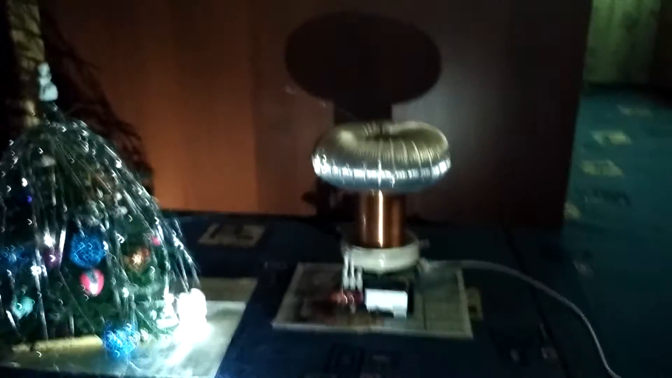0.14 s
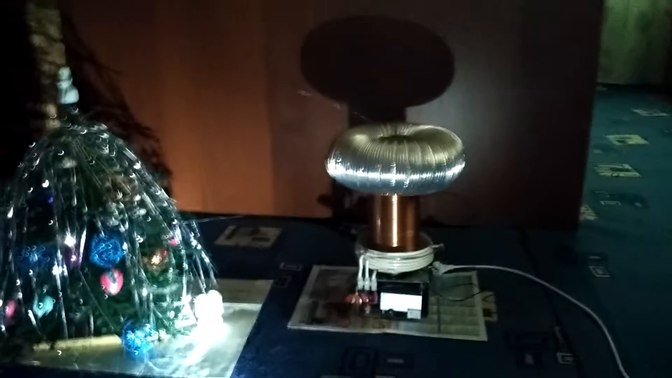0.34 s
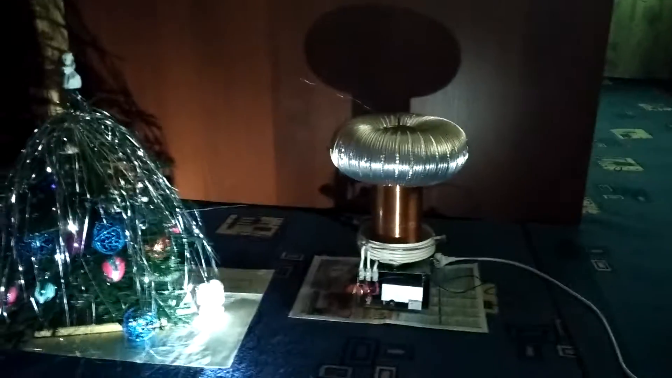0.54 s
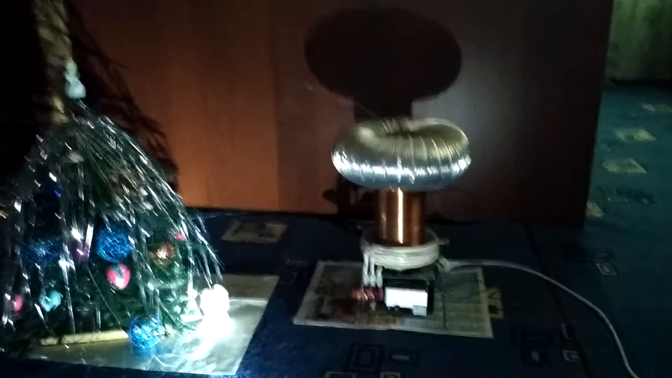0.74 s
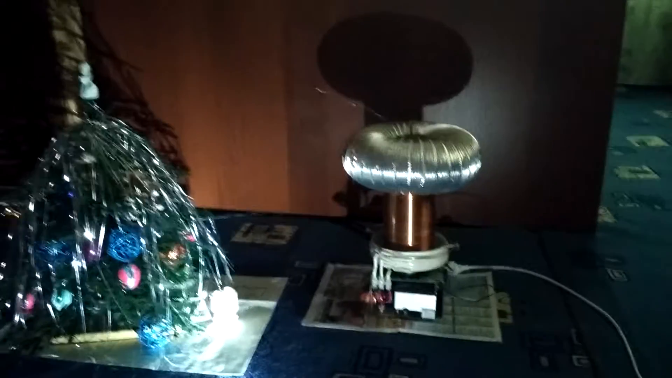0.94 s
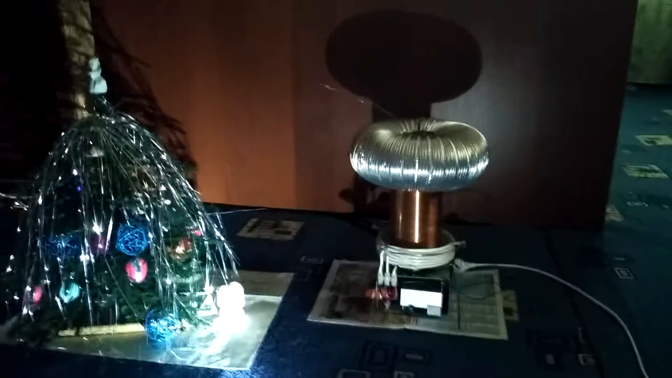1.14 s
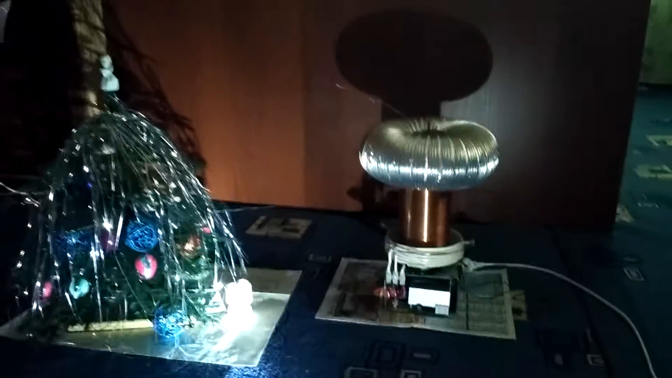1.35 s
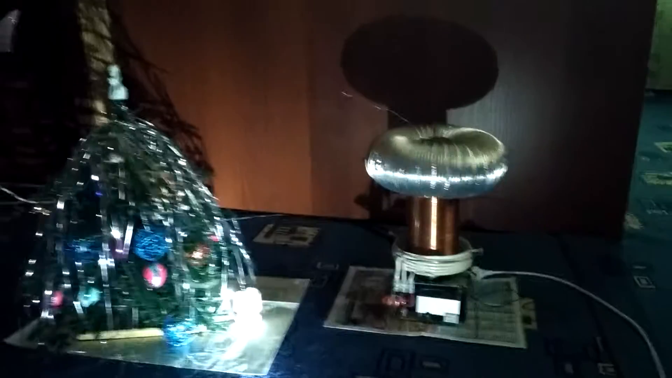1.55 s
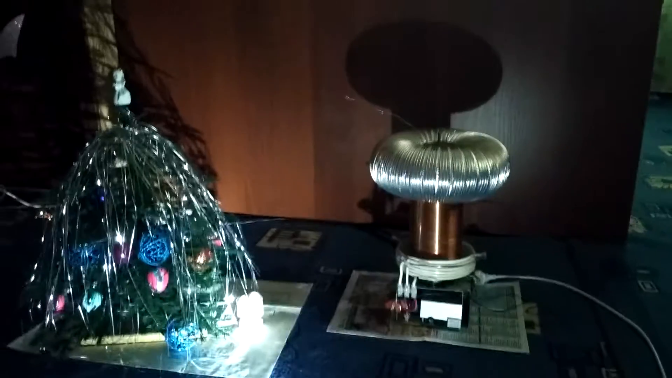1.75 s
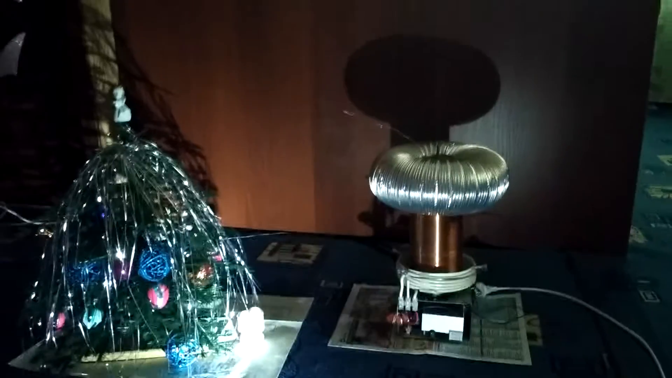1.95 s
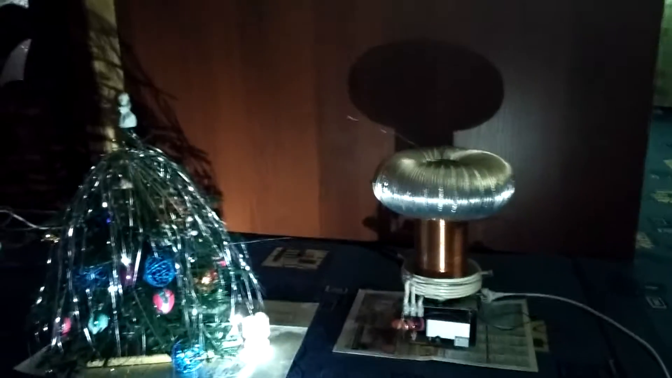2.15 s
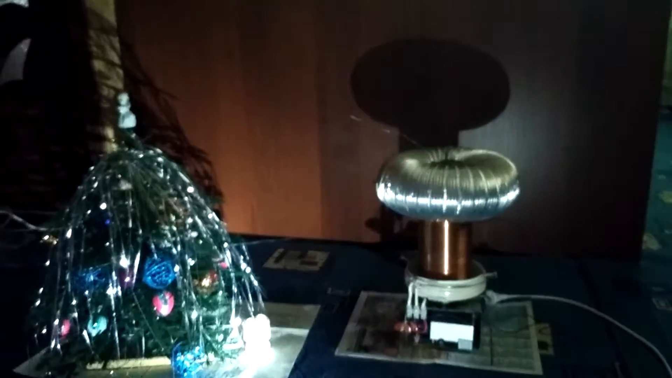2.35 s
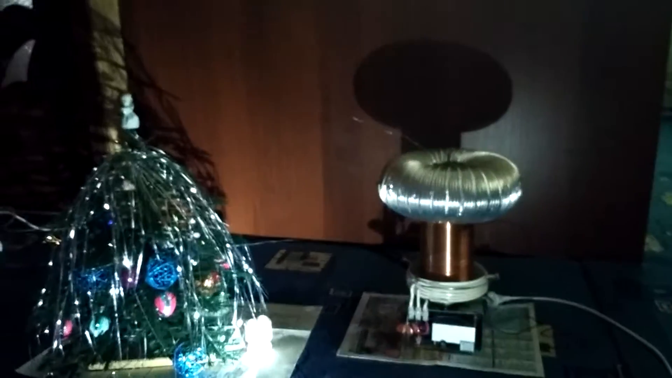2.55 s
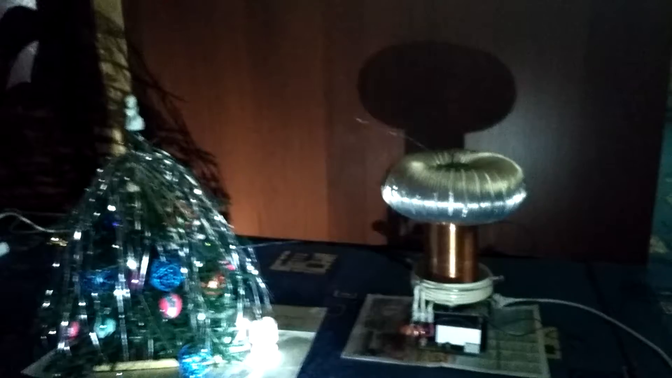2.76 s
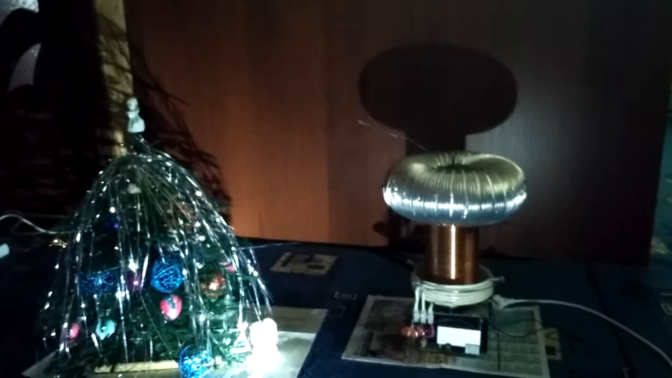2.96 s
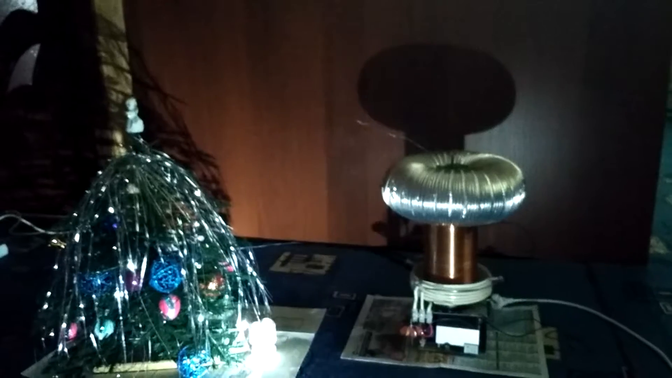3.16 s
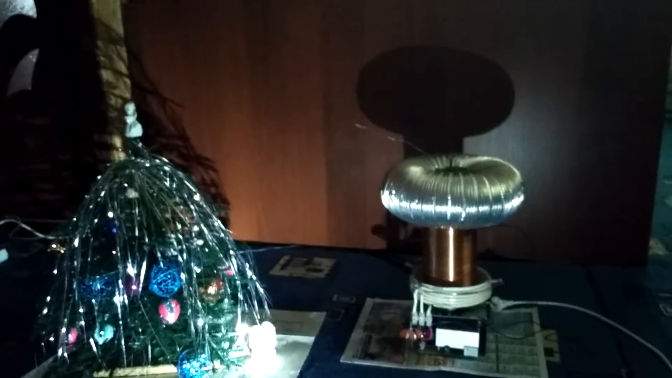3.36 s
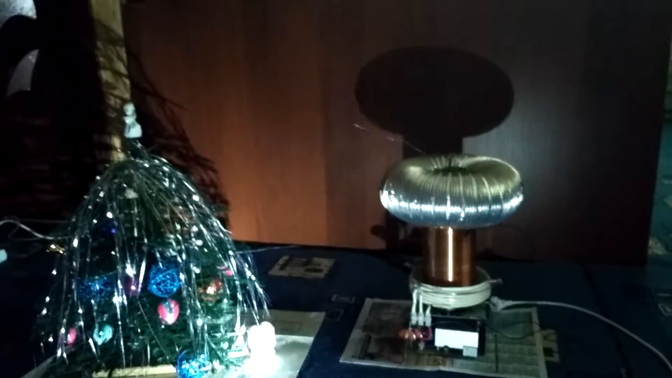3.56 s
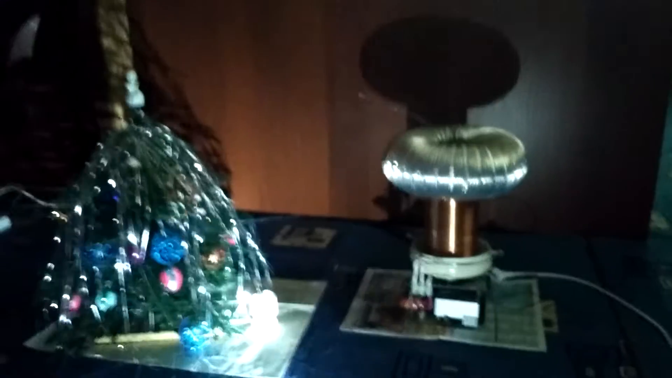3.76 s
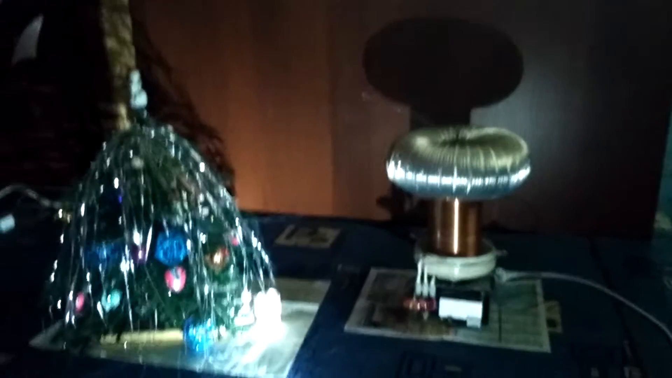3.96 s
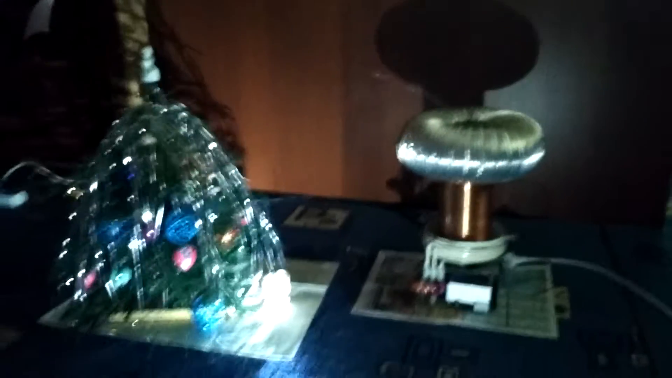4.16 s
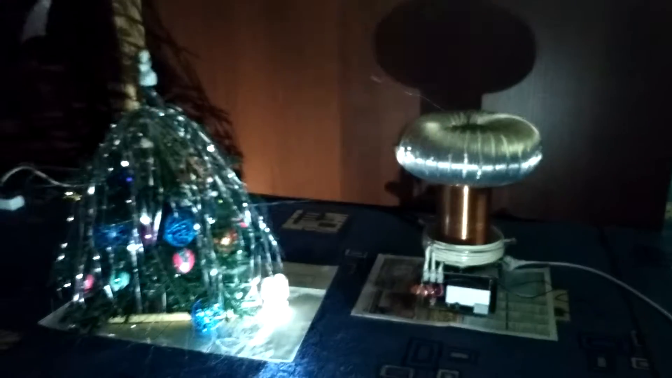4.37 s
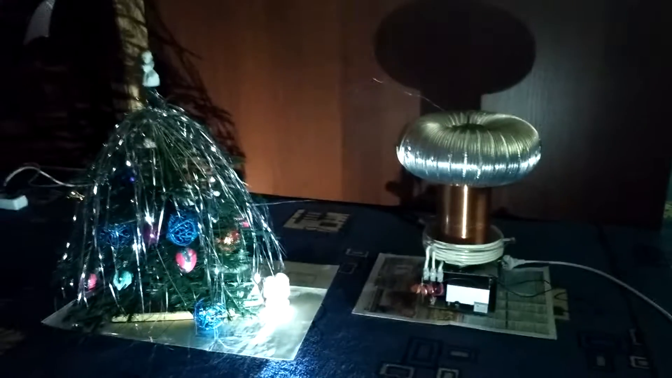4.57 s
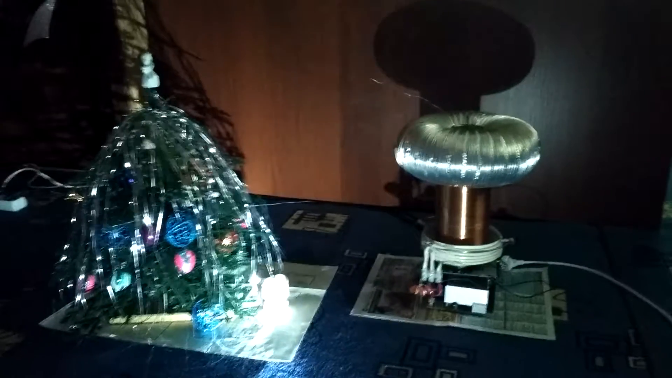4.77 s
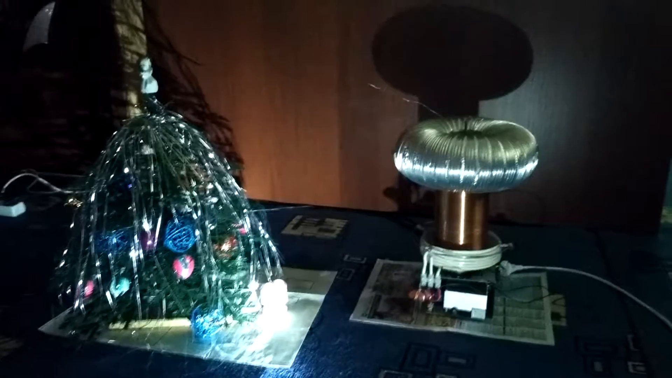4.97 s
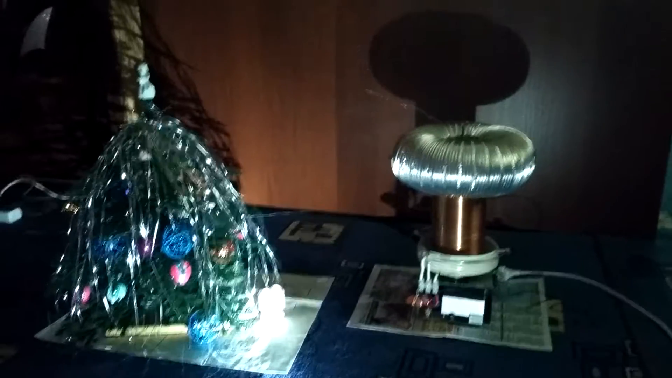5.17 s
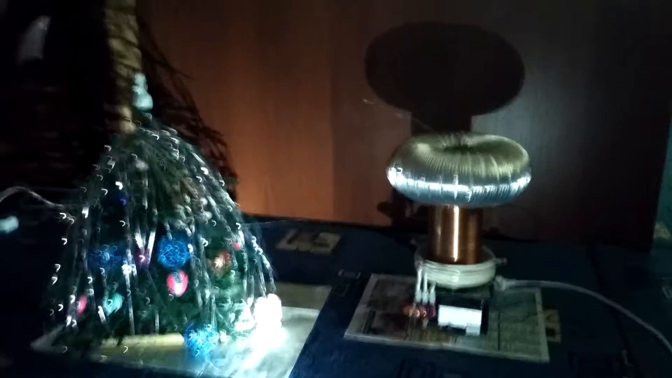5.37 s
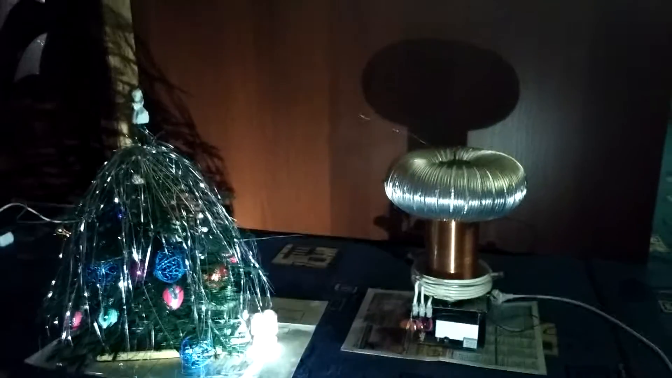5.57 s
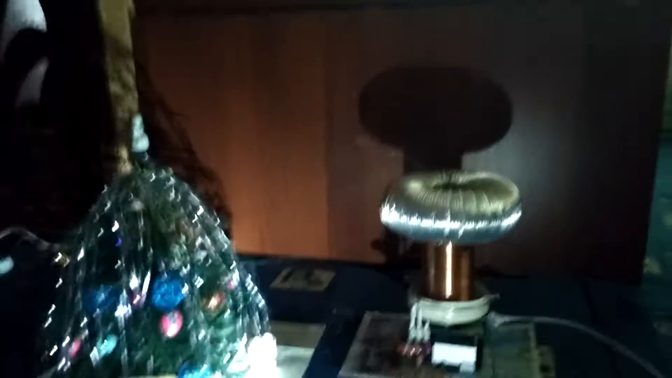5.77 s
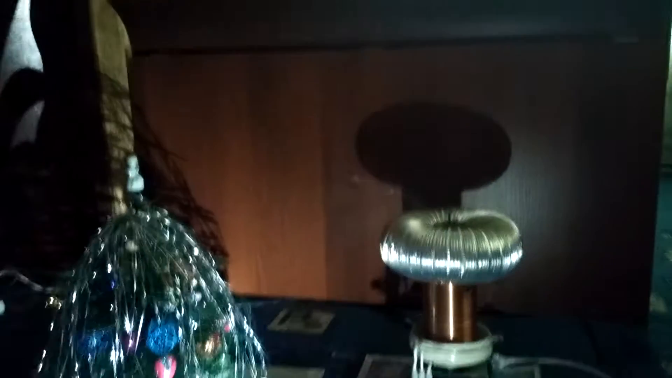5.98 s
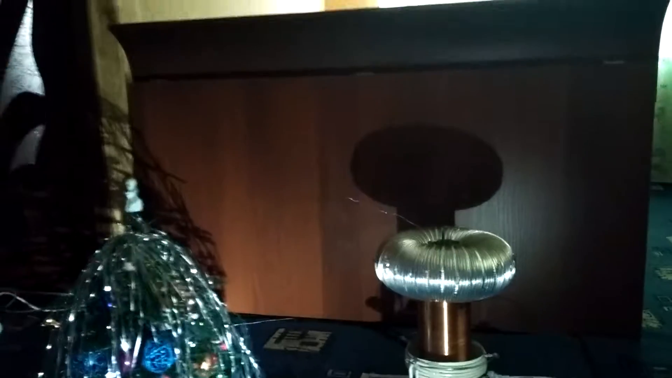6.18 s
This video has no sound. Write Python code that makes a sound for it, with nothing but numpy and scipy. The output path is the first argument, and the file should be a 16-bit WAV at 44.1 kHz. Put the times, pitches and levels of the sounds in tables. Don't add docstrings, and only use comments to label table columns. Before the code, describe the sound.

A furnished indoor room with faint low hum. A hand knocks the camera body with one dull thump, fingers rustle lightly, and a switch ticks. Then a small high-voltage coil fires hard, very loud spark cracks at an even five per second until the end. Each overloads the close handheld microphone and leaves a brief, boxy room tail that is quickly choked off.

```python
import sys
import numpy as np
from scipy import signal
from scipy.fft import rfft, irfft
from scipy.io import wavfile
from scipy.ndimage import uniform_filter1d

SR = 44100
rng = np.random.default_rng(int(sys.argv[2]) if len(sys.argv) > 2 else 0)


def wav_out(sig):
    wavfile.write(sys.argv[1], SR, np.round(np.clip(np.atleast_2d(sig).T, -1, 1) * 32767).astype(np.int16))


def attenuation_scalar(level_db):
    decades = np.asarray(level_db, float) / 20
    return 10 ** decades


N = 274302

# frequency [Hz], starting level [dB per Hz], t60 [s],
# share that is the same for every spark [0-1].
ROOM_TAIL = [(40, -13, 1, 1), (123, -10, 1, 0.5), (403, 0.5, 0.34, 1), (990, 4.5, 0.27, 0.4),
             (1450, 7, 0.21, 0.97), (2790, -1.5, 0.26, 0), (5030, 0.5, 0.19, 0.06), (9700, -4, 0.17, 0.5),
             (13200, -5, 0.15, 0), (16500, -4.5, .16, 1)]


def evened(x):
    return x / np.sqrt(np.mean(x ** 2) + 1e-20)


def read(points, hz, axis=1):
    table = np.array(points)
    return np.interp(np.log(hz + 1), np.log(table[:, 0] + 1), table[:, axis])


def add(mix, s, sound):
    part = mix[round(s * SR):][:len(sound)]
    part += sound[:len(part)]


def filtered(x, hz, kind, order=2):
    return signal.sosfilt(signal.butter(order, hz, kind, fs=SR, output="sos"), x)


def air_noise():
    # frequency [Hz], level [dB per Hz].
    spectrum = [(20, -25.5), (45, -6), (80, -6), (120, -14), (220, -13.5), (400, -15), (600, -19.5),
                (730, -26.5), (950, -17), (1400, -24), (2500, -30), (5000, -39), (9000, -51), (16000, -51)]
    level_db, rise_db_per_s = -57, 1.5
    frames, hz = N // 512 + 5, np.fft.rfftfreq(2048, 1 / SR)
    real, imag, patches = rng.standard_normal((frames, 1025, 3)).T
    patches = evened(uniform_filter1d(uniform_filter1d(patches, 3, 0), 10, 1))
    swell = uniform_filter1d(rng.standard_normal(real.shape), size=90, axis=0)
    swell = evened(uniform_filter1d(swell, size=9, axis=1))
    level = attenuation_scalar(read(spectrum, hz)[:, None] + 2.9 * patches + 0.5 * swell)
    air = signal.istft((real + 1j * imag) * level, nperseg=2048, noverlap=1536)[1][:N]
    rise_db = rise_db_per_s * np.minimum(np.arange(N) / SR - 1, .5)
    return attenuation_scalar(level_db + rise_db) * evened(air)


def drone():
    drone_hz, width_hz, level_db = 78, 4.7, -64
    wobble = filtered(rng.standard_normal((2, N)), width_hz, "low", order=1)
    envelope = 1.6 + evened(wobble[0]) + 1j * evened(wobble[1])
    tone = (envelope * np.exp(2j * np.pi * drone_hz * np.arange(N) / SR)).real
    return attenuation_scalar(level_db) * evened(tone)


def rustle():
    # start [s], level [dB].
    crackles = [
        (.028, -60),
        (.38, -66),
        (.58, -65),
        (.64, -63),
        (.70, -59),
        (.985, -61),
        (1.15, -67),
    ]
    t, out = np.arange(600) / SR, np.zeros(N)
    puffs = rng.standard_normal((len(crackles), len(t)))
    for (s, db), puff in zip(crackles, puffs):
        add(out, s, attenuation_scalar(db - 60 * t / .025) * puff)
    return filtered(out, [1500, 6000], "band", order=1)


def bumps():
    # start [s], level [dB], starting pitch [Hz], length [s].
    knock = [
        (.125, -40, 73, .02),
        (.1445, -22.5, 118, .021),
        (.148, -39, 275, 0.018),
        (.1645, -17, 78, 0.063),
        (.166, -36, 169, 0.041),
        (.17, -38, 250, 0.025),
        (.205, -44, 182, 0.02),
        (.262, -47, 62, .035),
    ]
    # start [s], level [dB], starting pitch [Hz], length [s].
    shifts = [
        (.019, -36, 76, 0.048),
        (.224, -38, 74, 0.035),
        (.328, -48, 68, 0.04),
        (.564, -46, 70, 0.044),
        (5.40, -28, 54, .08),
    ]
    out = np.zeros(N)
    for table, sag_octaves_per_s in ((knock, 18), (shifts, 0.7)):
        for s, db, hz, length_s in table:
            u = np.arange(0, 1, 1 / (length_s * SR))
            turns = np.cumsum(hz * 2 ** (-sag_octaves_per_s * length_s * u)) / SR
            push = np.sin(2 * np.pi * turns) * np.sin(np.pi * u ** 0.66) ** 1.6
            add(out, s, -attenuation_scalar(db) * push)
    return out


def ticks():
    # start [s], click level [dB], hiss level [dB], hiss t60 [s].
    contacts = [
        (.78, -56, -60, .15),
        (.806, -46, -50, 0.037),
        (.8122, -43, -66, .05),
        (0.8159, -18.5, -49.5, 0.35),
        (.837, -35, -68, .1),
        (1.2122, -48, -42, .03),
        (1.2135, -49, -50, 0.23),
    ]
    t, out = np.arange(12000) / SR, np.zeros(N)
    hisses = filtered(rng.standard_normal((len(contacts), len(t))), 4900, "high", order=10)
    hisses = filtered(hisses, 9000, "low", order=1)
    click = filtered(1. * (t == 0), 3600, "high")
    for (s, click_db, hiss_db, t60_s), hiss in zip(contacts, hisses):
        add(out, s, attenuation_scalar(click_db) * click + attenuation_scalar(hiss_db - 60 * t / t60_s) * hiss)
    return out


def early_echoes(t):
    # delay [s], level [dB].
    arrivals = [
        (0, 4),
        (.0013, 13.5),
        (.0029, 5.5),
        (.0057, 2),
        (.0084, 3.5),
        (0.0122, 13.5),
        (0.0128, 24.5),
        (.0362, 7.5),
    ]
    crack_s, level_db = 0.00033, -9
    u = t[:200] / crack_s
    crack, out = (1 - u / 2) * np.exp(-u / 2), np.zeros(len(t))
    for s, db in arrivals:
        add(out, s, attenuation_scalar(db + level_db) * crack)
    return filtered(out, 1300, "high")


def room_modes(t):
    # frequency [Hz], level [dB], t60 [s],
    # side [+1 if coil and microphone lie on like sides of the nodes, else -1].
    modes = [(76.6, -20.7, 0.17, 1), (98.7, -28.4, 0.3, -1), (126.9, -18.4, 0.18, -1),
             (155.3, -20.8, 0.18, -1), (188.7, -16.0, 0.07, 1), (235.8, -13.2, 0.12, -1),
             (287.0, -17.3, 0.21, 1), (306.0, -14.5, 0.07, -1), (360.2, -12.1, 0.15, 1),
             (376.5, -18.0, 0.13, -1), (416.5, -24.8, 0.35, 1), (429.7, -20.8, 0.14, -1),
             (460.3, -29.1, 0.28, -1), (495.9, -26.1, 0.35, 1), (552.8, -25.8, 0.3, 1),
             (588.4, -19.2, 0.15, -1), (616.6, -26.2, 0.19, 1), (657.7, -23.1, 0.23, -1),
             (738.8, -14.6, 0.13, 1), (753.8, -31.1, 0.35, 1), (783.9, -19.9, 0.15, -1),
             (830.6, -11.4, 0.07, 1), (943.8, -27.4, 0.23, 1), (1013.9, -2.0, 0.09, -1),
             (1015.7, -2.5, 0.11, 1), (1032.7, -30.0, 0.29, 1), (1086.7, -11.9, 0.08, 1),
             (1118.0, -21.6, 0.18, -1)]
    # frequency [Hz], level [dB], t60 [s].
    lingering = [(137, -31, .3), (422, -29, .38), (1110, -24, .2), (528, -29, .38), (1238, -31, .25),
                 (1378, -32, .25)]
    level_db, t60_scale, longest_s = 4, 0.81, 0.23
    ring = np.zeros(len(t))
    for hz, db, t60_s, side in modes:
        decay_db = 60 * t / min(t60_s * t60_scale, longest_s)
        ring += side * attenuation_scalar(db - decay_db) * np.sin(2 * np.pi * hz * t)
    for k, (hz, db, t60_s) in enumerate(lingering):
        ring += (-1) ** k * attenuation_scalar(db - 60 * t / t60_s) * np.sin(2 * np.pi * hz * t)
    return attenuation_scalar(level_db) * ring


def diffuse(noise):
    fresh_db, fresh_s = 2, 0.051
    hz, t, z = signal.stft(noise, SR, nperseg=256)
    first_db = fresh_db * np.outer(hz / 12000, np.exp(-t / fresh_s))
    z = z * attenuation_scalar(first_db - 60 * t / read(ROOM_TAIL, hz, axis=2)[:, None])
    return signal.istft(z, SR, nperseg=256)[1][..., :noise.shape[-1]]


def spark_tails(treble_db, size):
    grain_db, level_db = 1, -5
    t, hz = np.arange(size) / SR, np.fft.rfftfreq(size, 1 / SR)
    same = np.clip(read(ROOM_TAIL, hz, axis=3), 0, 1)
    rays, weights = rng.standard_normal((2, len(treble_db) + 1, size))
    grain = evened(uniform_filter1d(weights, size=12, axis=1))
    rays = evened(rays * attenuation_scalar(grain_db * grain))
    fixed, fresh = rfft(rays[0]), rfft(rays[1:])
    lobes = evened(uniform_filter1d(rng.standard_normal(fresh.shape), size=400, axis=1))
    tilt_db = (np.array(treble_db)[:, None] + 2) * np.clip(hz / 7000, 0, 1)
    colour = attenuation_scalar(read(ROOM_TAIL, hz) + tilt_db + 1.28 * lobes)
    tails = diffuse(irfft((same * fixed + np.sqrt(1 - same ** 2) * fresh) * colour))
    thicken = 1 - 0.48 * np.exp(-t / 0.0035)
    return tails * attenuation_scalar(level_db) * thicken


def sparks():
    treble_db = [-3.5, -2.5, -1.1, 0, -1.5, -1.5, -1.5, -0.5, 0, 2.5, 0.5, 4, 0, 4, 2.5, 2.5, 1.5, 4.5, 1.5,
                 0, 2.5, 0.5, 3, 1.5, 2.5]
    first_s, period_s, jitter_s = 1.37745, 0.19991, 0.0001
    strength_db, uneven_db, fork_spread_s = -0.16, -1.6, 0.0001
    size, out = 16384, np.zeros(N)
    t = np.arange(size) / SR
    early = early_echoes(t) + room_modes(t)
    tails = spark_tails(treble_db, size)
    draws = rng.uniform(0, 1, (len(treble_db), 6))
    for k, (tail, (late, big, *forks)) in enumerate(zip(tails, draws)):
        fork_delays = (np.square(forks) * fork_spread_s * SR).astype(int)
        smear = np.bincount(fork_delays) / len(forks)
        s = first_s + k * period_s - 2 * jitter_s * late
        db = strength_db + 2 * uneven_db * (big - .5)
        add(out, s, attenuation_scalar(db) * (np.convolve(early, smear)[:size] + tail))
    return out


def scene():
    return (sparks() + bumps() + ticks() + air_noise() + drone() + rustle())[None]


def overload(x):
    ceiling_db, drive_db, bass_hz = -1.8, 2, 43.5
    bent = np.tanh((attenuation_scalar(drive_db) * abs(x)) ** 1.587) ** (1 / 1.601)
    return filtered(attenuation_scalar(ceiling_db) * bent * np.sign(x), bass_hz, "high", order=2)


def suppress(x):
    # frequency [Hz], part of running average counted as noise [dB], deepest cut [dB].
    bands = [(60, -15.5, -4.5), (300, -18.5, -12), (1000, -19, -4.5), (2500, -16, -8), (4870, -14, -10),
             (5070, -23.5, -7), (9000, -22, -12.5), (16000, -25.5, -7.5)]
    # tail level under the running average [dB], cut [dB].
    drops = [(-10, -9), (-19, -7)]
    split_hz, memory_s, soft_db, split_ring = 5050, 0.31, 0.5, .0006
    hz, t, z = signal.stft(x, SR, nperseg=441, noverlap=294)
    low = hz < split_hz
    power = (abs(z[:, (hz > 500) & low]) ** 2).mean(1, keepdims=True)
    decisions = np.minimum(np.arange(len(t)) // 3 * 3 + 1, len(t) - 1)
    power = uniform_filter1d(power, size=3, axis=2)[..., decisions] + 1e-20
    r = np.exp(-.01 / 3 / memory_s)
    usual = signal.lfilter([1 - r], [1, -r], power)
    under_db = 10 * np.log10(power / usual)
    step_db = sum(db * (.5 + .5 * np.tanh((at_db - under_db) / soft_db)) for at_db, db in drops)
    noise = usual * attenuation_scalar(2 * read(bands, hz))[:, None]
    deepest = attenuation_scalar(read(bands, hz, axis=2))[:, None]
    gain = deepest + (1 - deepest) * power / (power + noise)
    z = z * gain * attenuation_scalar(step_db * low[:, None])
    x = signal.istft(z, SR, nperseg=441, noverlap=294)[1][:, :N]
    split = np.cos(2 * np.pi * split_hz * np.arange(-441, 442) / SR)
    return x + split_ring * signal.oaconvolve(x, split[None], "same")


def top_cut(x):
    return signal.sosfilt(signal.butter(12, 16820, fs=SR, output="sos"), x)


def record(dry):
    x = suppress(overload(dry))
    edge = signal.firwin(255, 15900, window=("kaiser", 7), fs=SR)
    mix = signal.oaconvolve(x, edge[None], "same")
    return top_cut(mix)


dry = scene()
out = record(dry)
wav_out(out)
```